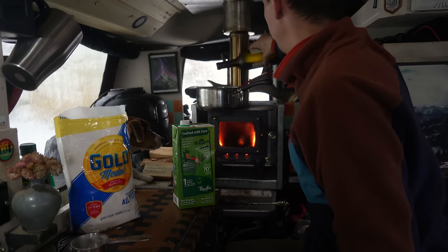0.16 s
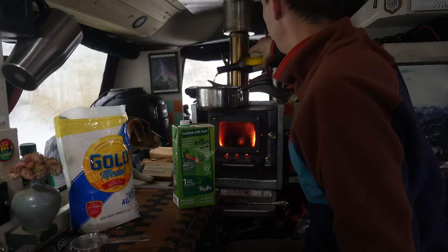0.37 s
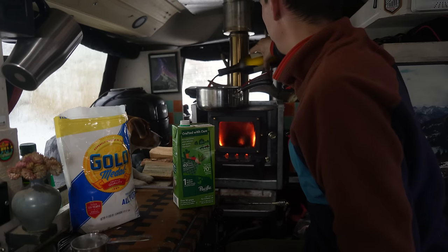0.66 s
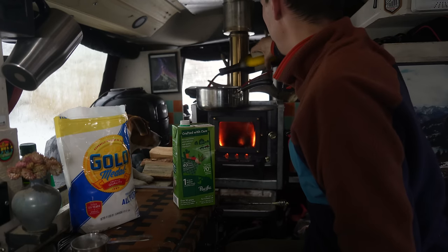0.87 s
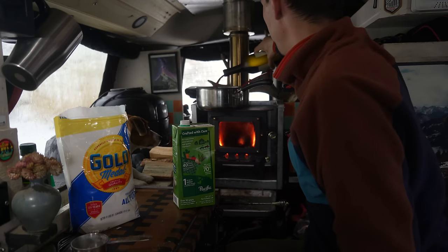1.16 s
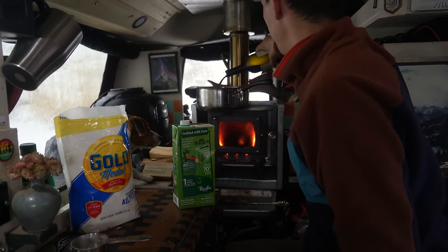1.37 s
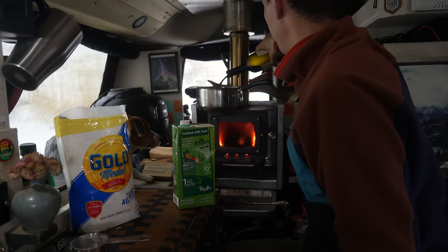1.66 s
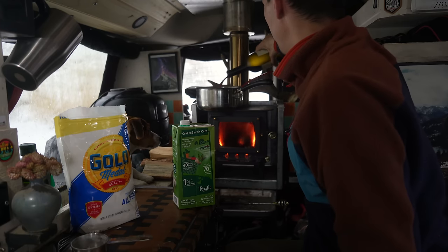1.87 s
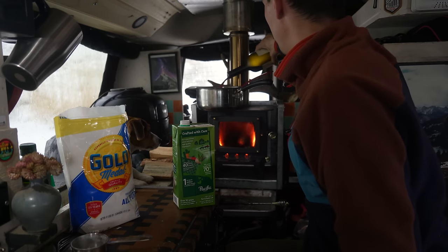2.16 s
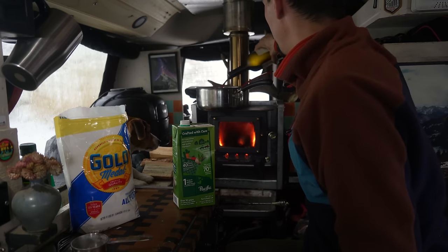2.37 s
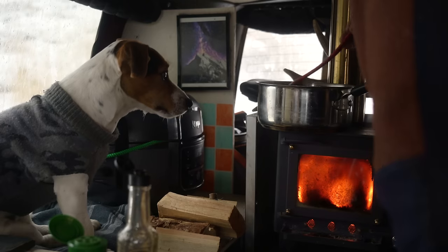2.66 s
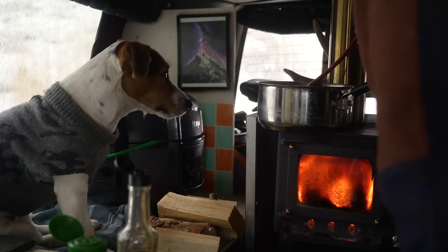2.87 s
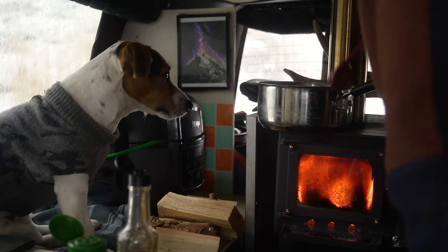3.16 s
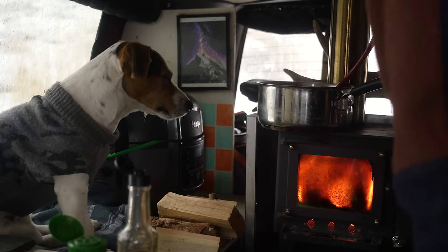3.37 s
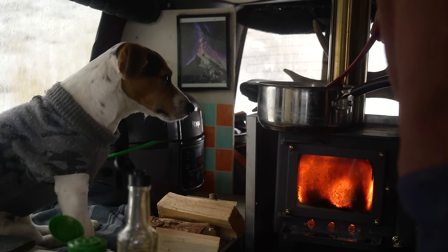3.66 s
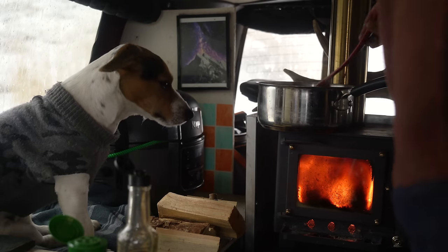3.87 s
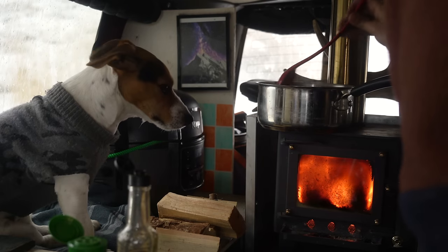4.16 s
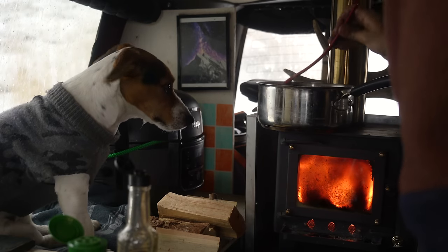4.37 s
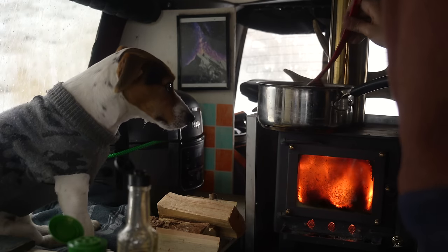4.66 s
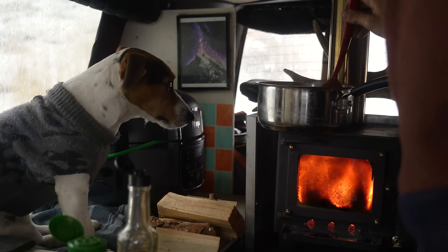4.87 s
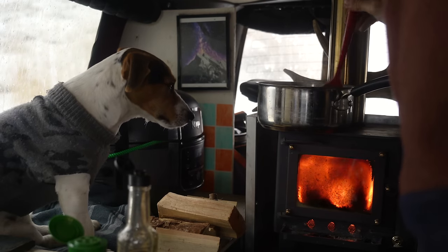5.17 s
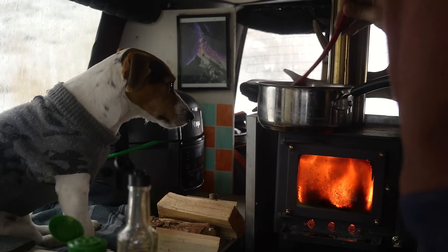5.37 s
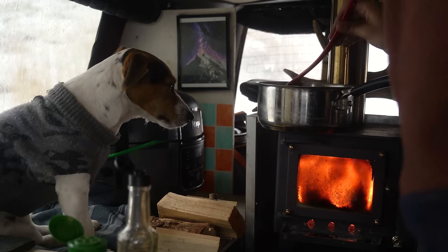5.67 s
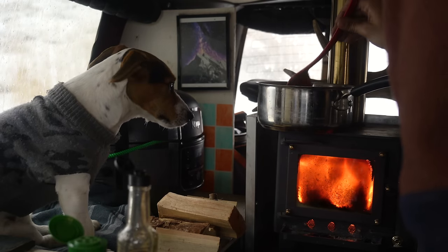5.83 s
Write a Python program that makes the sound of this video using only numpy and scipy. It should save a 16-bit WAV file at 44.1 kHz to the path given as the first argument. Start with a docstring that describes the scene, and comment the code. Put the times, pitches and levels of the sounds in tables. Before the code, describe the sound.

A faint trickle into a steel pan over a quiet fan, then abruptly a spoon scraping, swishing and knocking in the pan above low fire rumble.

```python
"""A thin stream of liquid trickles into a steel pan while a fan hums and chirps faintly. At 2.5 s they give way
to a spoon that scrapes the bottom, swishes through the liquid and knocks, over the low rumble of the stove fire.
Place: a cramped, padded cabin, with the microphone close, so direct sound outweighs a short tail.
The trickle is ringing bubbles, with short damped tones throughout; the fan is sine lines and noise,
the fire is noise; the spoon is random slips and struck modes."""
import sys
import numpy as np
from scipy import signal
from scipy.fft import rfft, irfft
from scipy.io import wavfile
from scipy.ndimage import uniform_filter1d

SR = 44100
rng = np.random.default_rng(int(sys.argv[2]) if len(sys.argv) > 2 else 0)


def log_audio(samples):
    """Write samples as a 16-bit WAV file to the path given in sys.argv[1]."""
    # one column per channel
    frames = np.atleast_2d(samples).T
    # limit to full scale, then quantise
    limited = np.clip(frames, -1, 1)
    pcm = np.round(limited * 32767).astype(np.int16)
    wavfile.write(sys.argv[1], SR, pcm)


N = 264776
TIME = np.arange(N) / SR
POUR_END_S = 2.5


def undb(db):
    """Decibels to gain."""
    return 10 ** (np.asarray(db) / 20)


def level(x, db):
    """Scale to an rms level."""
    return x * undb(db) / np.sqrt(np.mean(x ** 2))


def peak(x, db):
    """Scale to a peak level."""
    return x * undb(db) / np.abs(x).max()


def gain_curve(rows):
    """Rows of (s, dB) as a gain per sample."""
    return undb(np.interp(TIME, *np.transpose(rows)))


def at_hz(points, hz):
    """Read (Hz, value) points on a log-frequency axis."""
    f, value = np.transpose(points)
    return np.interp(np.log(np.maximum(hz, 1)), np.log(f), value)


def response(points, size=4096):
    """Causal, minimum-phase impulse response of a spectrum that falls away beyond its ends."""
    hz = np.maximum(np.fft.rfftfreq(size, 1 / SR), 1)
    outside = np.minimum(hz / points[0][0], 1) * np.minimum(points[-1][0] / hz, 1)
    cepstrum = irfft(np.log(undb(at_hz(points, hz)) * outside ** 2))
    # folding the cepstrum forward in time makes the response causal
    cepstrum[1:size // 2] *= 2
    cepstrum[size // 2 + 1:] = 0
    return irfft(np.exp(rfft(cepstrum)))


def through(x, impulse):
    """Pass a sound through an impulse response."""
    return signal.fftconvolve(x, impulse)[:len(x)]


def coloured_noise(colour, db):
    """Steady noise with a given spectrum and rms level."""
    return level(through(rng.standard_normal(N), response(colour)), db)


def walk(rate):
    """Smooth random curve of rms 1 that takes a new direction about `rate` times a second."""
    k = int(SR / rate)
    held = np.repeat(rng.standard_normal(N // k + 1), k)
    smooth = uniform_filter1d(uniform_filter1d(held, k), k)
    return level(smooth[:N], 0)


def clicks(rate, spread_db):
    """Random impulses, `rate` a second; a positive spread makes a few large, a negative one a few small."""
    size = undb(spread_db * np.minimum(rng.exponential(size=N), 4))
    happens = rng.random(N) < rate / SR
    return happens * size * rng.choice([-1, 1], N)


def ring(modes, pitch=1, size=16384):
    """Decaying modes of (Hz, dB, t60 s); neighbours swing in opposite directions."""
    t = TIME[:size]
    out = np.zeros(size)
    for k, (hz, db, t60) in enumerate(modes):
        decay = undb(db - 60 * t / t60)
        out += (-1) ** k * decay * np.sin(2 * np.pi * hz * pitch * t)
    return out


def bubble(hz, cycles, glide=0.13, size=2048):
    """A short ring whose pitch rises, as of a bubble nearing the surface; it falls to 1/e in `cycles` turns."""
    turns = TIME[:size] * hz
    age = np.minimum(turns / cycles, 10)
    envelope = np.exp(-age) * (1 - np.exp(-turns))
    return envelope * np.sin(2 * np.pi * turns * (1 + glide * age / 10))


def add(out, s, sound):
    """Mix a sound in at time s."""
    i = max(int(s * SR), 0)
    out[i:i + len(sound)] += sound[:max(len(out) - i, 0)]


def froth(spread_db, cycles, count=2200):
    """A crowd of tiny bubbles from 800 Hz to 12 kHz, at random times and strengths."""
    out = np.zeros(N)
    for when, pitch, size in rng.random((count, 3)):
        hz = 800 * 15 ** pitch
        strength = undb(spread_db * min(-np.log(size), np.e))
        add(out, when * N / SR, strength * bubble(hz, cycles))
    return level(out, 0)


def pushes(rows, attack_s, release_s, size=32768):
    """Gain of (start s, length s, dB) pushes: each has a quick rise, an arched hold and an exponential release."""
    arch_db = 3.5  # the middle is this much stronger than the ends
    power, age = np.zeros(N), TIME[:size]
    for s, length_s, db in rows:
        arch = undb(db + arch_db * (np.sin(np.pi * np.minimum(age / length_s, 1)) - 1))
        rise = np.minimum(age / attack_s, 1)
        release = np.exp(-np.maximum(age - length_s, 0) / release_s)
        add(power, s, (rise * arch * release) ** 2)
    return np.sqrt(power)


STROKE_ATTACK_S, STROKE_RELEASE_S = 0.015, 0.023
SWISH_ATTACK_S, SWISH_RELEASE_S = 0.01, 0.023  # the swish fades as quickly as the scrape
GLIDE_SCRAPE_DB, GLIDE_SWISH_DB = -69.5, -75.5  # the spoon gliding lightly between strokes
# Spoon strokes in the pan. Each row: start in seconds, length in seconds,
# scrape on the bottom in dB, swish of liquid in dB.
STROKES = [(2.637, 0.056, -48, -76), (2.715, 0.14, -44, -66.5), (2.839, 0.079, -52, -60.5),
           (3.244, 0.074, -42, -61), (3.316, .12, -52.5, -68.5), (3.454, 0.046, -48.5, -59.5),
           (3.504, 0.32, -55.5, -61.5), (3.782, 0.2, -59, -65.5), (4.307, .016, -81, -65),
           (4.372, 0.085, -49, -83), (4.451, 0.068, -50.5, -61.5), (4.591, 0.071, -56.5, -60.5),
           (4.676, 0.31, -59.5, -68), (4.897, 0.063, -54, -56), (4.998, 0.062, -57, -58),
           (5.363, 0.02, -61, -52), (5.419, 0.031, -46, -81), (5.488, 0.089, -52.5, -74),
           (5.625, 0.11, -70, -70.5), (5.986, .012, -52, -39.5)]


def stroke_gains():
    """Gains of scrape and swish: each stroke lifts both above the light glide of the spoon."""
    start_s, length_s, scrape_db, swish_db = np.transpose(STROKES)
    scrape = pushes(zip(start_s, length_s, scrape_db), STROKE_ATTACK_S, STROKE_RELEASE_S)
    swish = pushes(zip(start_s, length_s, swish_db), SWISH_ATTACK_S, SWISH_RELEASE_S)
    return np.hypot(scrape, undb(GLIDE_SCRAPE_DB)), np.hypot(swish, undb(GLIDE_SWISH_DB))


# The steel pan's modes, damped by its contents. Each row: frequency in Hz, relative level in dB,
# 60 dB decay time in seconds. Rubbing and knocks both play it.
PAN = [(174.4, -12, 0.047), (288, -9, 0.096), (439, -12.5, 0.093), (525.5, 2.5, 0.1), (695, -13, 0.122),
       (820, -2.5, 0.13), (934, -0.5, 0.112), (1050, -14.5, 0.39), (1201, -8.5, 0.15), (1491, -6.5, 0.1),
       (1555, -10, 0.53), (1868, -3, 0.11), (2016, 2.5, 0.091), (2214, 0.5, 0.025), (2477, -26, 0.1),
       (2417, -9, 0.079), (2860, -5, 0.089), (3140, -19, 0.045), (4780, -13.5, 0.023), (4500, -50.5, .09),
       (5100, -26, 0.059), (7100, -25.5, .055)]
# Dry rub of spoon on bottom. Each row: frequency in Hz, relative level in dB.
SCRAPE_COLOUR = [(200, -19.5), (380, -12.5), (520, -3), (640, -4.5), (850, 2.5), (1200, -2.5), (1400, -2.5),
                 (1650, -7), (2100, -21.5), (2500, -12), (3300, -28), (6000, -32)]
# How hard rubbing excites the pan. Each row: frequency in Hz, relative level in dB.
RUB_DRIVE = [(300, -17), (520, 2), (700, -14), (950, -1), (1200, 8.5), (1600, 2.5), (2100, -9), (2450, -17),
             (6000, -21.5)]
# The spoon dragging down the wall after the first knock. Each row: start in seconds, length in seconds, level in dB.
DRAGS = [(3.258, .08, -46.5)]
# Tone of that drag. Each row: frequency in Hz, relative level in dB.
DRAG_COLOUR = [(1100, -32), (1450, 7.5), (1720, 15), (1900, -17), (2200, -34), (2750, -22), (3500, -19)]
# Tone of the swept liquid. Each row: frequency in Hz, relative level in dB.
SWISH_COLOUR = [(900, -15), (1400, 2), (1900, 3.5), (2600, -1), (3300, 0.5), (5200, 0), (6500, 1),
                (7600, -7), (9000, -8.5), (11000, -13), (15000, -17.5)]


def stirring():
    """The spoon sticks and slips on the bottom, ringing the pan, and sweeps liquid over the hot steel."""
    slips = clicks(rate=1800, spread_db=3.0) * undb(2.54 * walk(90))
    rub = level(through(slips, response(SCRAPE_COLOUR)), -3.55)
    # spoon and sloshing liquid load the pan now here, now there, so its resonances shift
    ringing = sum(through(slips * walk(9), ring(PAN, pitch)) for pitch in (.95, 1, 1.04))
    ringing = through(ringing, response(RUB_DRIVE))
    # even out the ringing so that the strokes alone set its strength
    local_rms = np.sqrt(uniform_filter1d(ringing ** 2, size=2048) + 1e-12)
    pan = undb(-9.0) * ringing / local_rms
    drag_tone = level(through(slips, response(DRAG_COLOUR)), 0)
    drag = drag_tone * pushes(DRAGS, STROKE_ATTACK_S, STROKE_RELEASE_S)
    spatter = level(clicks(rate=1400, spread_db=-1.0), 0)
    bubbles = undb(-1.5) * froth(spread_db=-3.5, cycles=14.6)
    wet = (spatter + bubbles) * undb(1.2 * walk(60))
    liquid = level(through(wet, response(SWISH_COLOUR)), 0)
    scrape, swish = stroke_gains()
    return (rub + pan) * scrape + drag + liquid * swish


def pan_ring(size=16384):
    """Each blow finds the modes in its own proportions; the uneven load splits each into a close pair."""
    chance = rng.standard_normal((len(PAN), 3))
    modes, twins = [], []
    for (hz, db, t60), (loud, twin_loud, apart) in zip(PAN, chance):
        modes.append((hz, db + 1.5 * loud, t60))
        twins.append((hz * (1 + .035 * apart), db - 2 + 2 * twin_loud, .5 * t60))
    return (ring(modes) + ring(twins)) * (1 - np.exp(-TIME[:size] / 0.0011))


# The spoon's short, hollow clack. Each row: frequency in Hz before the knock's pitch factor,
# relative level in dB, 60 dB decay time in seconds.
SPOON = [(747, -5, 0.0086), (920, -2, 0.026), (1220, -8.5, 0.014), (1450, -1.5, 0.02), (1840, 1, 0.0079),
         (2275, 3, 0.0056), (2757, -21.5, 0.029)]
# Tone of the chattering contact. Each row: frequency in Hz, relative level in dB.
TICK_COLOUR = [(1500, -2), (3000, -0.5), (3900, -10), (4800, 1), (5400, -2.5), (6500, -6), (7700, -12),
               (8600, -9.5), (10000, -18), (15000, -30)]
# Spoon knocks on the pan. Each row: start in seconds, nominal clack peak in dB, tick peak in dB,
# pan ring peak in dB, gap to the second contact in seconds, pitch factor of the clack.
KNOCKS = [(3.2353, -15, -16.5, -20.5, 0.0031, 1.03), (3.367, -36.5, -54, -68, 0.0028, 0.58),
          (3.572, -55, -49, -72, 0.0015, 0.59), (3.653, -41.5, -47, -60, 0.001, 0.59),
          (3.7254, -40, -40, -46.5, 0.0028, 0.92), (4.3502, -11, -26.5, -31.5, 0.0018, 1),
          (4.488, -49, -61, -46, 0.0018, 0.77), (5.353, -51, -72, -65, 0.0032, 0.59),
          (5.368, -47, -48, -52, 0.00372, 1), (5.428, -47, -65, -52, .003, 0.46),
          (5.501, -49.5, -57, -47, 0.0021, 1.33), (5.8962, -46, -46, -76, 0.00061, 1.1),
          (5.9535, -7.5, -25, -26.5, 0.0018, 1.014)]


def knocks(size=16384):
    """Each knock lands twice, edge then bowl: the spoon clacks, the contact chatters and the pan rings on."""
    out, t = np.zeros(N), TIME[:size]
    for s, clack_db, tick_db, ring_db, gap_s, pitch in KNOCKS:
        chatter = rng.standard_normal(size) * np.exp(-t / 0.0033) * (1 - np.exp(-t / 0.0015))
        tick = peak(through(chatter, response(TICK_COLOUR)), tick_db)
        clack = peak(ring(SPOON, pitch), clack_db)
        pan = peak(pan_ring(), ring_db)
        add(out, s, tick + pan + 0.36 * clack)
        add(out, s + gap_s, 1.004 * clack)
    return out


def splash(hz, length_s, count=40, size=4096):
    """A spurt hits the surface with a faint spit and traps a cluster of bubbles of roughly one size."""
    out = np.zeros(size)
    times = rng.random(count) * length_s
    pitches = rng.laplace(size=count).clip(-3, 3)
    strengths = rng.uniform(-0.71, 1, count)
    for s, pitch, strength in zip(times, pitches, strengths):
        drop = bubble(min(hz * 2 ** (.22 * pitch), SR / 3), cycles=9.7)
        spit = 0.92 * np.array([1, -.4])
        add(out, s, strength * drop)
        add(out, s, strength * spit)
    return out / np.sqrt(np.sum(out ** 2) / (length_s * SR))


FIZZ_DB = -4  # steady fizz, relative to the flow
# small random spurts: level relative to the flow, middle pitch, spread either way, length
DRIBBLE_DB, DRIBBLE_HZ, DRIBBLE_OCTAVES, DRIBBLE_S = -4.5, 4790, 0.62, 0.027
# Flow of the trickle into the pan. Each row: time in seconds, level in dB.
FLOW = [(0.0, -60), (0.34, -68.5), (1.43, -60.5), (1.91, -61.5), (2.37, -61.5), (2.5, -58.5)]
# Tone of the fizz. Each row: frequency in Hz, relative level in dB.
TRICKLE_COLOUR = [(500, 0), (900, -17.5), (1700, -1), (2500, -3.5), (3500, -8.5), (6200, -5), (8000, -14),
                  (15000, -7)]
# Larger spurts of the stream. Each row: start in seconds, level in dB, typical bubble pitch in Hz,
# length in seconds.
SPLASHES = [(0.4, -68, 6340, 0.019), (0.667, -62.5, 6340, 0.025), (.732, -63.5, 2090, .03),
            (0.994, -64.5, 6140, .028), (1.177, -58, 4370, 0.01), (1.228, -61, 3400, 0.031),
            (1.339, -60, 2470, 0.058), (1.354, -56, 5170, .033), (1.485, -60, 2900, .021),
            (1.619, -61.5, 3350, 0.035), (1.692, -61.5, 3350, .055), (1.851, -60, 5420, 0.021),
            (1.867, -57.5, 1800, 0.013), (1.974, -59, 1800, .03), (2.345, -59, 3500, 0.038)]


def pour(count=22):
    """The thin stream fizzes and dribbles as strongly as it flows, with a larger spurt now and then."""
    bubbles = froth(spread_db=1.3, cycles=6.4, count=6000)
    out = level(through(bubbles, response(TRICKLE_COLOUR)), FIZZ_DB)
    for k, (when, pitch) in enumerate(rng.random((count, 2))):
        hz = DRIBBLE_HZ * 2 ** (DRIBBLE_OCTAVES * (2 * pitch - 1))
        s = (k + when) / count * POUR_END_S
        add(out, s, undb(DRIBBLE_DB) * splash(hz, DRIBBLE_S))
    out = out * gain_curve(FLOW)
    for s, db, hz, length_s in SPLASHES:
        add(out, s, undb(db) * splash(hz, length_s))
    return out


# Short damped tones: low thuds and ringing with the knocks, bubble-like blips high and low.
# Each row: start in seconds, peak in dB, pitch in Hz, ring in cycles (to 1/e).
SHORT_TONES = [(.572, -53, 725, 2.1), (.684, -50, 6100, 16), (.75, -48.5, 680, 4.5),
               (1.263, -46.5, 2180, 19), (2.159, -45.5, 1770, 16), (3.119, -51, 379, 3.3),
               (3.24, -34.5, 385, 1.3), (3.376, -45.5, 218, 1.2), (3.727, -36.5, 850, 3.3),
               (3.728, -43.5, 285, 0.8), (4.362, -37, 539, 8.3), (5.428, -42, 713, 12),
               (5.433, -46.5, 528, 6), (5.437, -43, 890, 8)]


def short_tones():
    """Low thuds, ringing and bubble-like blips: single damped sines whose pitch rises slightly as they die."""
    out = np.zeros(N)
    for s, db, hz, cycles in SHORT_TONES:
        add(out, s, peak(bubble(hz, cycles, glide=0.039, size=8192), db))
    return out


CHIRP_FIRST_S, CHIRP_PERIOD_S, CHIRP_WIDTH_S = .078, .1209, .011
SQUEAL_DB = -71  # rms before it is cut into chirps and made to waver
FAN_AIR_DB = -59  # rms before its slight wavering
# Steady lines of the fan. Each row: frequency in Hz, rms in dB before slow swelling, rms pitch waver in Hz.
HUM = [(199.3, -67.5, 0.21), (314.6, -70, 3.5), (399.6, -69.5, .46), (593, -72, 9)]
# Air moved by the fan. Each row: frequency in Hz, relative level in dB per Hz.
FAN_AIR = [(12, -28), (20, -6), (70, 1), (148, -5.5), (202, -2.5), (505, -9), (597, -9), (667, -11),
           (985, -16), (1580, -17), (6020, -26), (9930, -32.5), (13500, -33), (15500, -38)]
# Tone of the chirp. Each row: frequency in Hz, relative level in dB.
CHIRP_COLOUR = [(12000, -33), (12700, 4), (13300, -2), (13900, -9), (14600, -22)]


def fan():
    """Wavering hum, moving air and a very high chirp that repeats evenly."""
    hum = np.zeros(N)
    for hz, db, waver in HUM:
        turns = np.cumsum(hz + waver * walk(40.07)) / SR
        hum += level(np.sin(2 * np.pi * turns), db) * undb(1.7 * walk(0.51))
    air = coloured_noise(FAN_AIR, FAN_AIR_DB) * undb(0.28 * walk(8.6))
    # seconds from the nearest chirp
    periods = (TIME - CHIRP_FIRST_S) / CHIRP_PERIOD_S
    from_chirp_s = ((periods + .5) % 1 - .5) * CHIRP_PERIOD_S
    squeal = coloured_noise(CHIRP_COLOUR, SQUEAL_DB) * undb(2 * walk(6.3))
    return hum + air + squeal * np.exp(-(from_chirp_s / CHIRP_WIDTH_S) ** 2)


DRAUGHT_DB, DRAUGHT_RISE_DB_PER_S = -70.5, 4  # level at the end of the pour, and its growth
THUMP_ATTACK_S, THUMP_RELEASE_S = 0.03, 0.036
STOVE_AIR_DB = -63.5
# Low rumble of the fire, and tone of the thumps. Each row: frequency in Hz, relative level in dB.
DRAUGHT_COLOUR = [(40, -27.5), (80, -10.5), (130, -0.5), (190, -11), (300, -10.5), (500, -26.5)]
# Low thumps under the stirring and knocks. Each row: start in seconds, length in seconds, level in dB.
THUMPS = [(3.217, 0.071, -58), (3.66, 0.23, -58), (4.746, 0.29, -57), (5.34, 0.16, -51),
          (5.742, 0.12, -52.5)]
# Soft, even air of the stove. Each row: frequency in Hz, relative level in dB per Hz.
STOVE_AIR = [(20, 3.5), (35, 3), (70, -4), (130, 2.5), (207, -14.5), (330, -8.5), (430, -10.5),
             (650, -11.5), (1000, -16), (1600, -23.5), (2500, -27), (6000, -30.5), (15500, -38)]


def fire():
    """The stove's draught rumbles as low noise, growing slowly, with low thumps at times, over a soft, even hiss."""
    draught = undb(DRAUGHT_DB + DRAUGHT_RISE_DB_PER_S * (TIME - POUR_END_S))
    thumps = pushes(THUMPS, THUMP_ATTACK_S, THUMP_RELEASE_S)
    rumble = coloured_noise(DRAUGHT_COLOUR, 0) * np.hypot(draught, thumps)
    return rumble + coloured_noise(STOVE_AIR, STOVE_AIR_DB)


# The padded cabin's decay. Each row: frequency in Hz, 60 dB decay time in seconds.
CABIN_T60 = [(150, 1), (600, 0.068), (2000, 0.069), (5000, 0.081), (14000, 0.027)]


def cabin(x, wet_db, size=16384):
    """Close, soft walls: a dense noise tail, each octave dying at its own rate and the top soonest."""
    t, hz = TIME[:size], np.fft.rfftfreq(size, 1 / SR)
    noise, tail = rfft(rng.standard_normal(size)), 0
    for centre in 125 * 2 ** np.arange(8):
        octave = np.maximum(1 - np.abs(np.log2(np.maximum(hz, 1) / centre)), 0)
        tail = tail + irfft(noise * octave) * undb(-60 * t / at_hz(CABIN_T60, centre))
    tail *= 1 - np.exp(-(t / 0.00075) ** 2)
    return x + undb(wet_db) * through(x, tail / np.sqrt(np.sum(tail ** 2)))


# Faint noise, strongest at the lowest frequencies with some high hiss, opposite in left and right. Each row:
# frequency in Hz, relative level in dB.
SIDE_COLOUR = [(20, 21), (70, 19.5), (250, 6.5), (600, 4), (2000, -20), (4500, -18.5), (7000, -4),
               (11000, 10), (15000, 7)]


def scene():
    """Pouring, then stirring, in the centre; a faint noise, strongest at the lowest frequencies, is opposite in
    left and right."""
    pouring = np.clip((POUR_END_S - TIME) / 0.0072 + .5, 0, 1)  # gives way within 7.2 ms
    first = fan() + cabin(pour(), wet_db=-7.0)
    second = fire() + cabin(stirring(), wet_db=-8) + cabin(knocks(), wet_db=-5.5)
    centre = pouring * first + (1 - pouring) * second + cabin(short_tones(), wet_db=-9.5)
    side = coloured_noise(SIDE_COLOUR, -82.0)
    return centre + side * np.array([[1], [-1]])


def record(dry):
    """The recorder cuts the top steeply, with an elliptic low-pass at 15.8 kHz."""
    low_pass = signal.ellip(10, .1, 80, 15800, fs=SR, output="sos")
    return signal.sosfilt(low_pass, dry)


dry = scene()
out = record(dry)
log_audio(out)
```